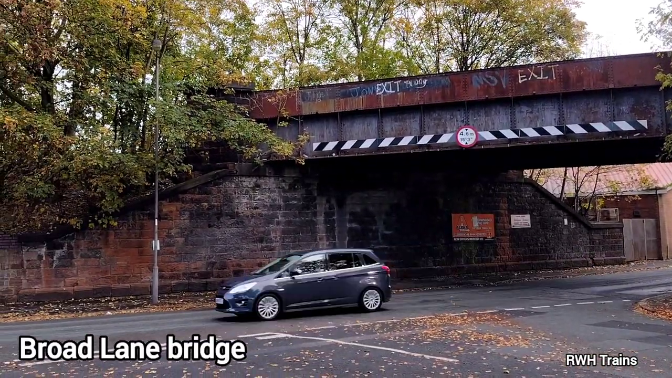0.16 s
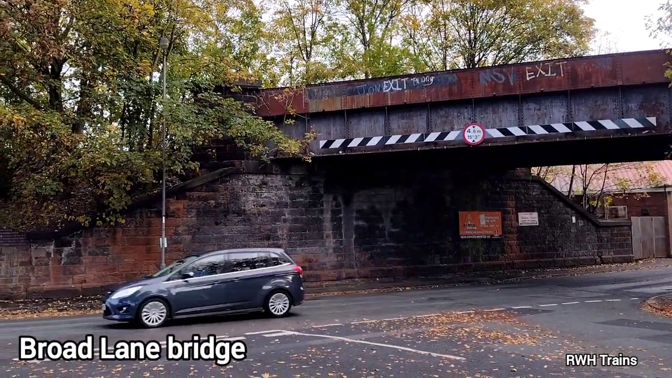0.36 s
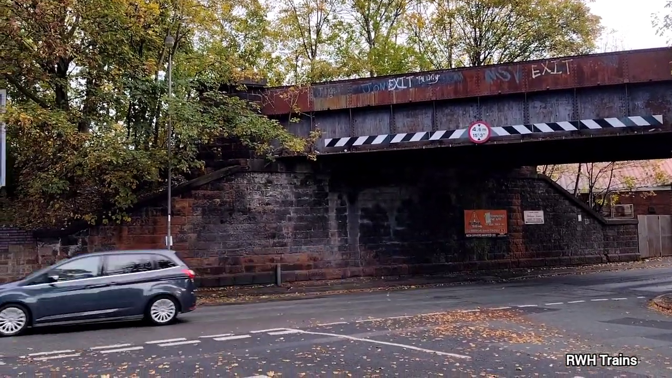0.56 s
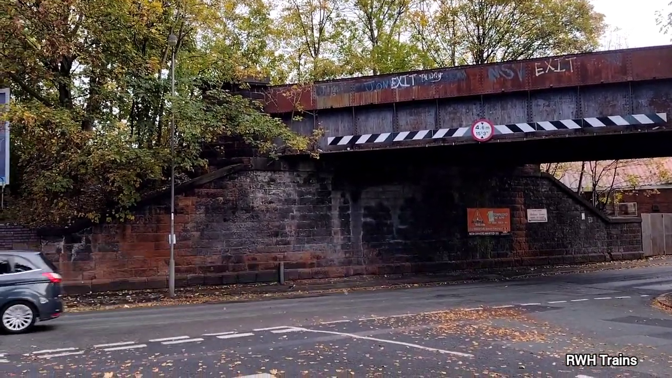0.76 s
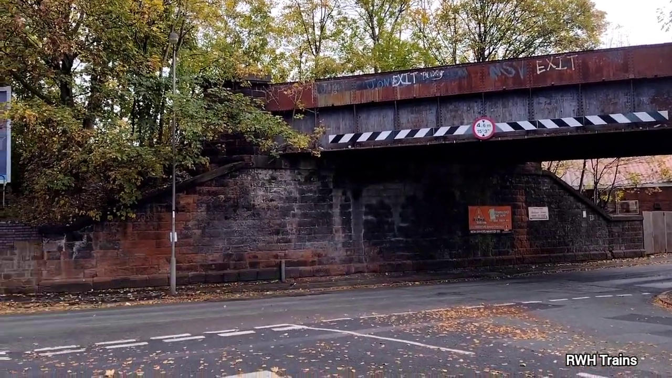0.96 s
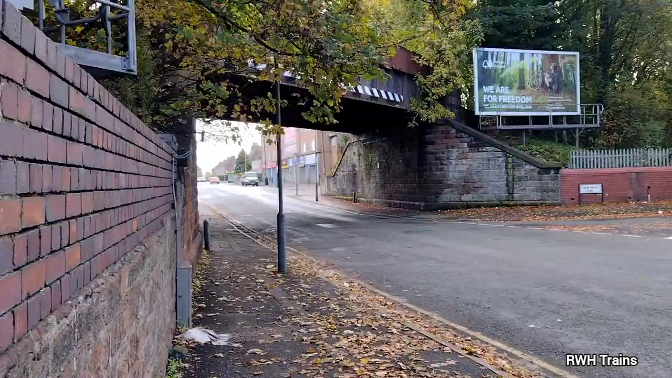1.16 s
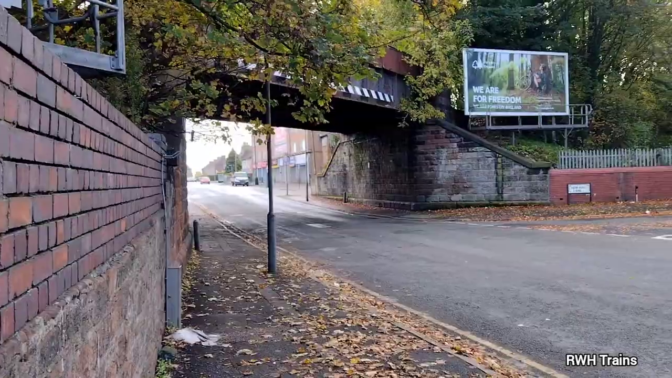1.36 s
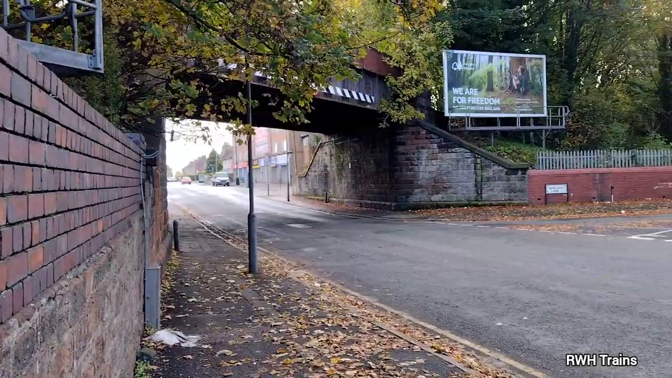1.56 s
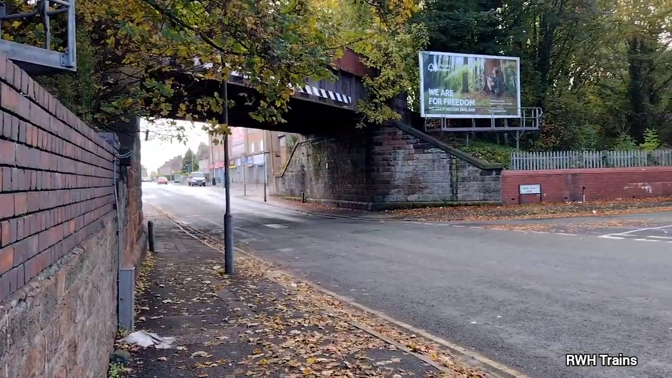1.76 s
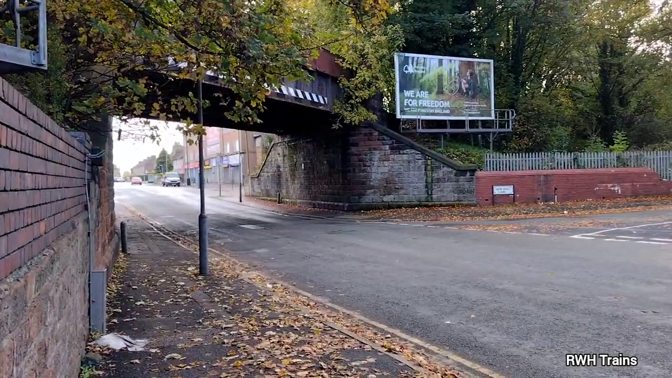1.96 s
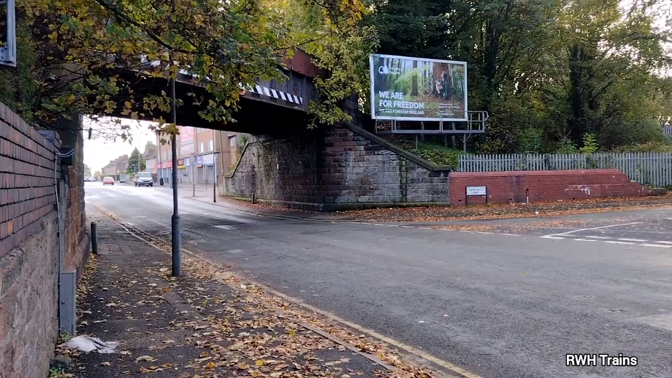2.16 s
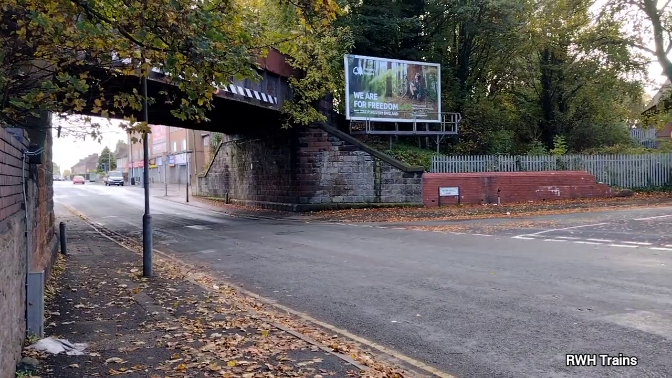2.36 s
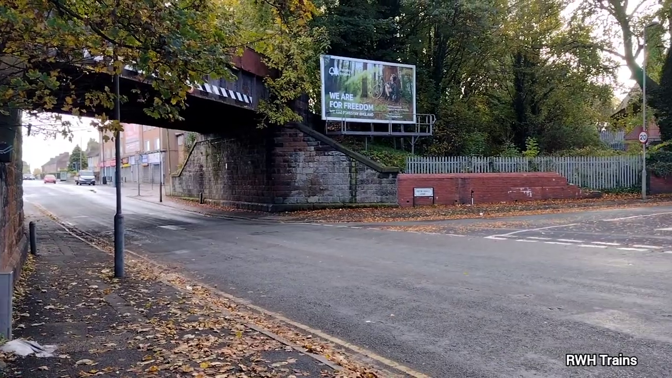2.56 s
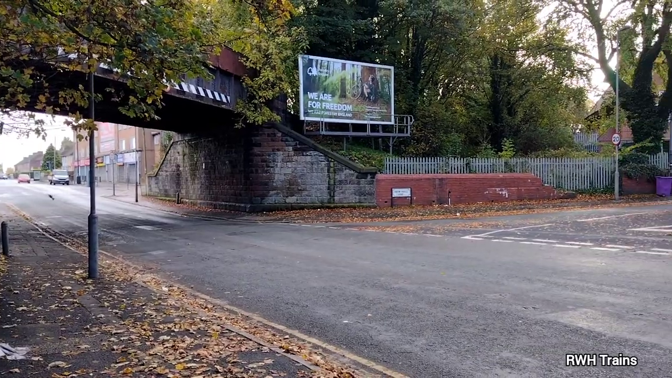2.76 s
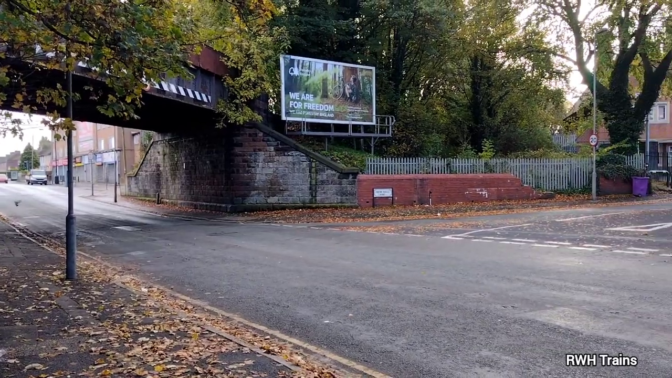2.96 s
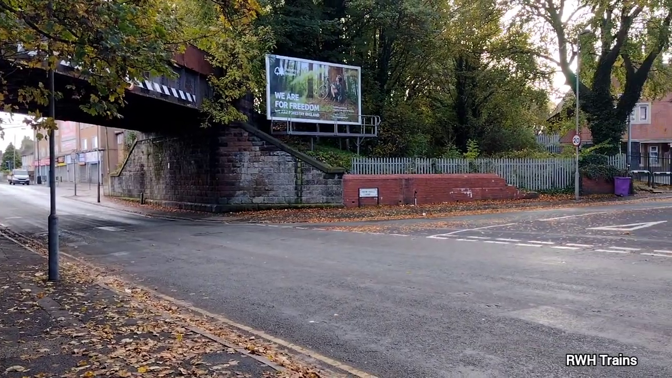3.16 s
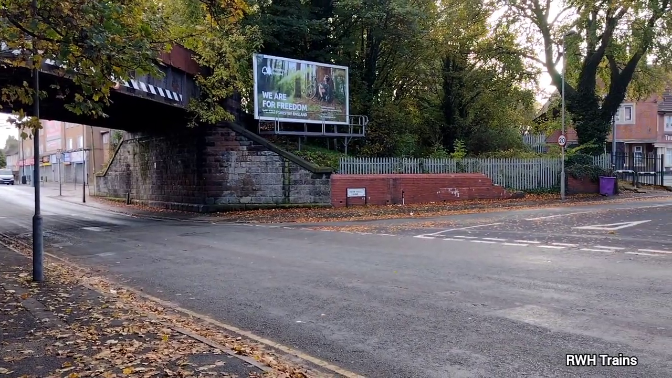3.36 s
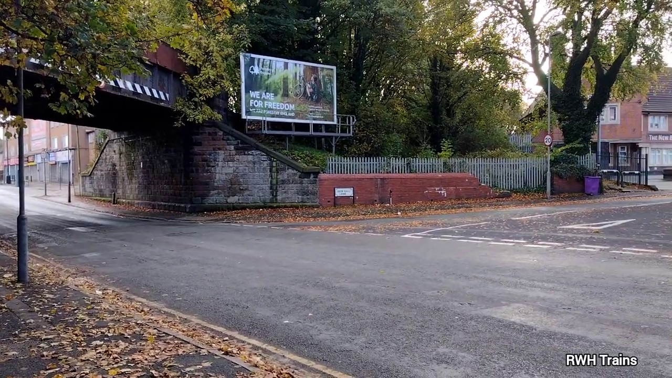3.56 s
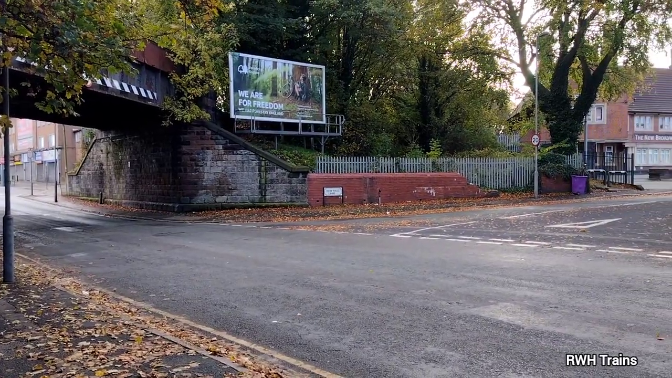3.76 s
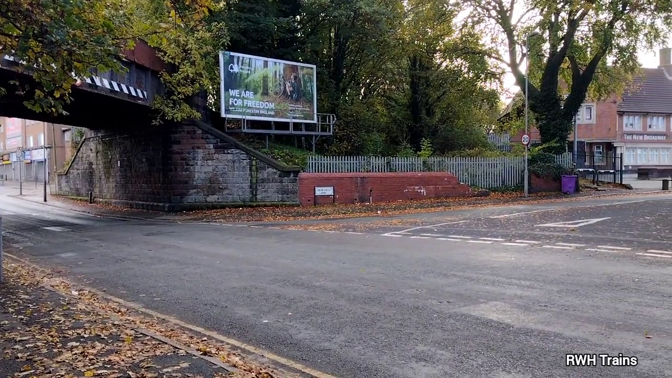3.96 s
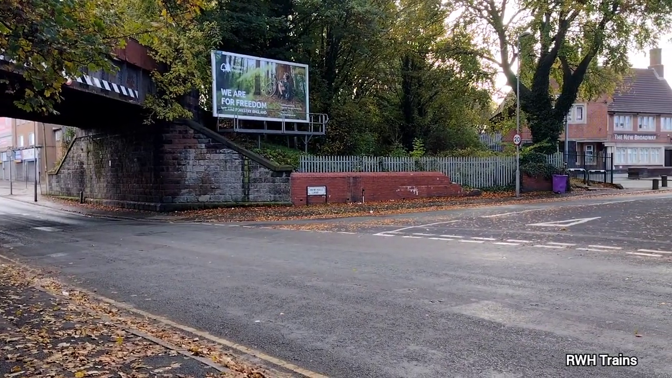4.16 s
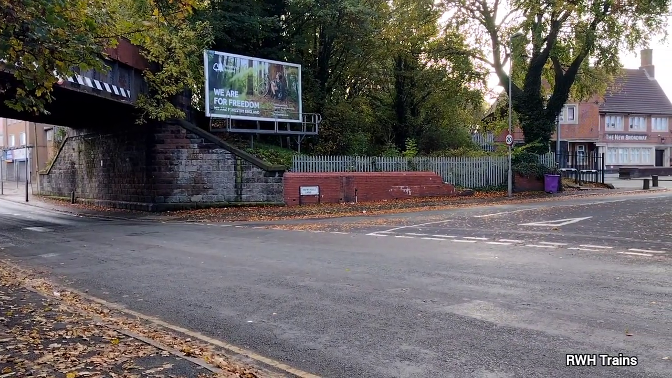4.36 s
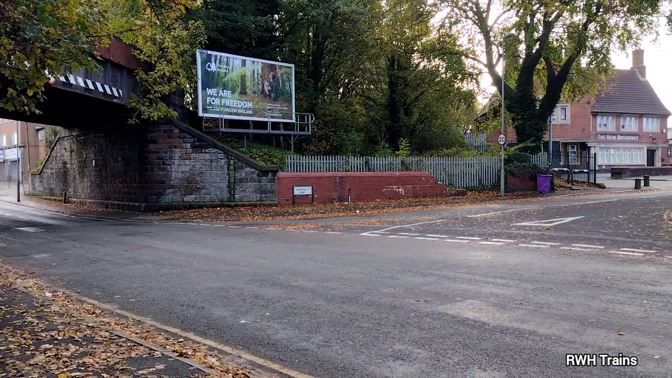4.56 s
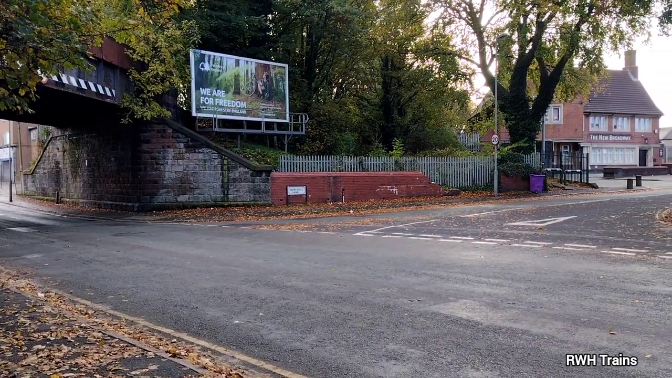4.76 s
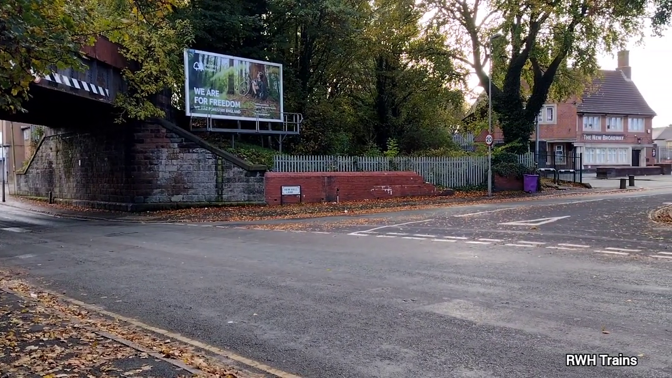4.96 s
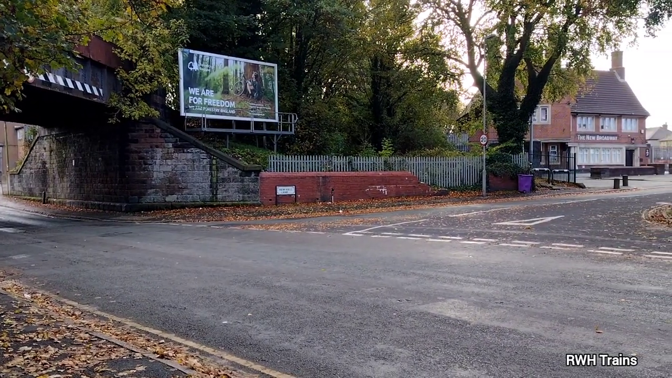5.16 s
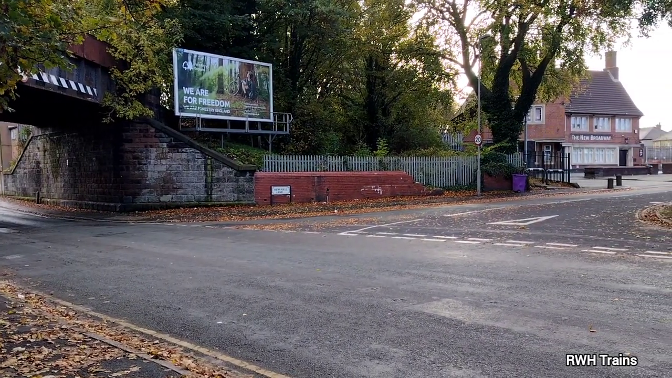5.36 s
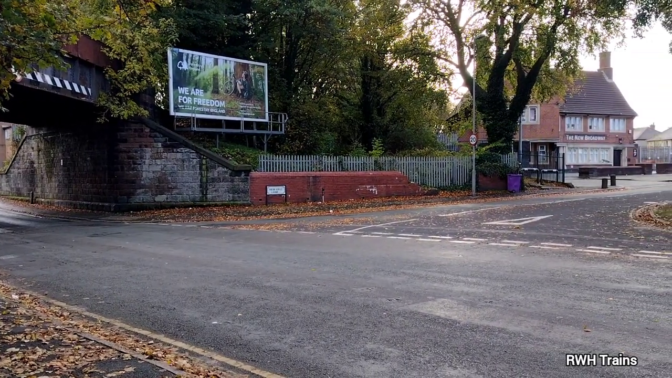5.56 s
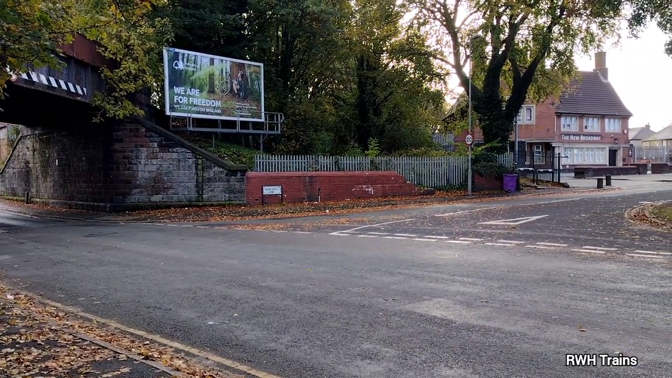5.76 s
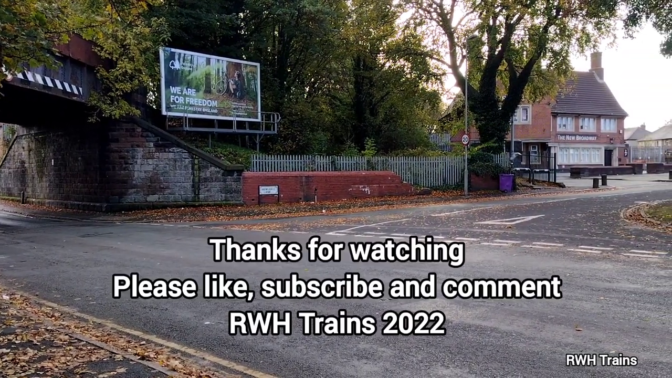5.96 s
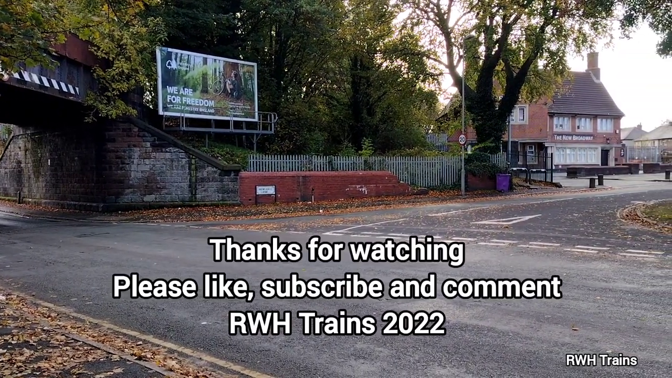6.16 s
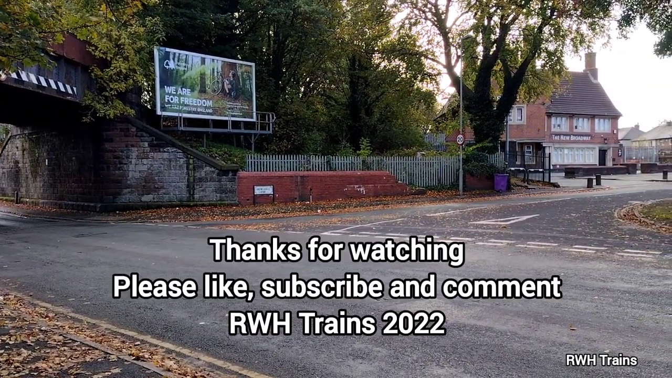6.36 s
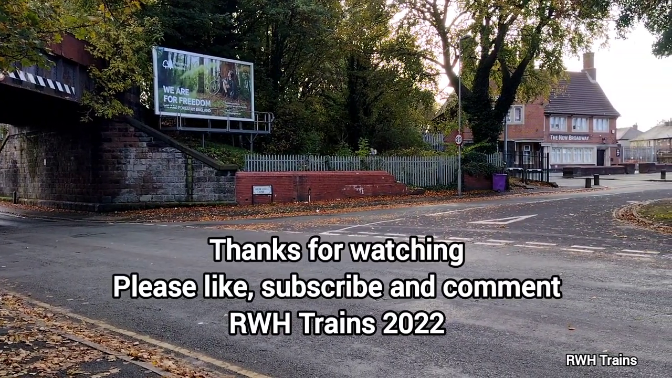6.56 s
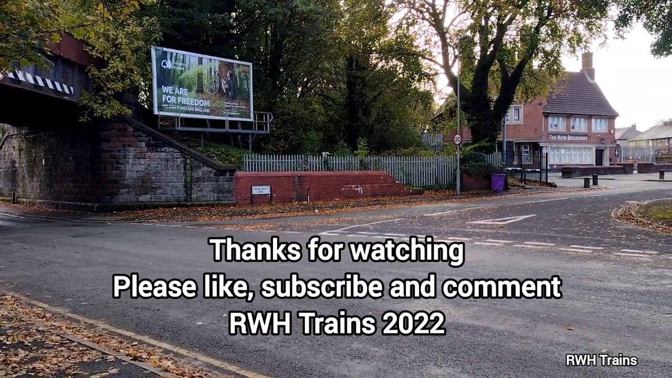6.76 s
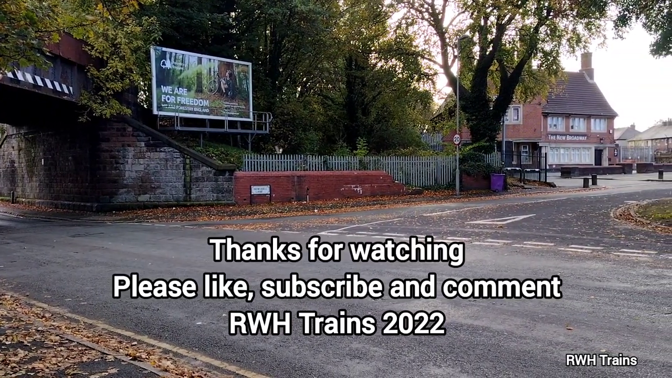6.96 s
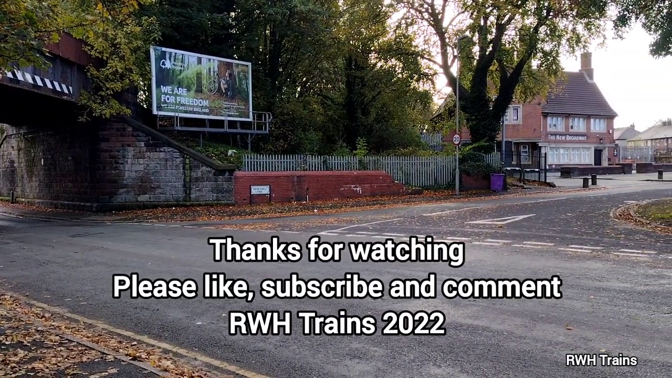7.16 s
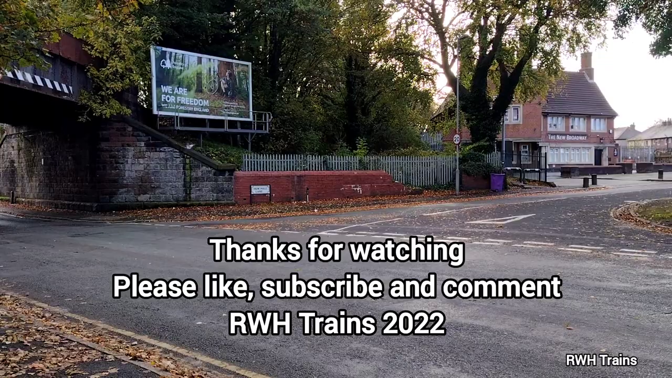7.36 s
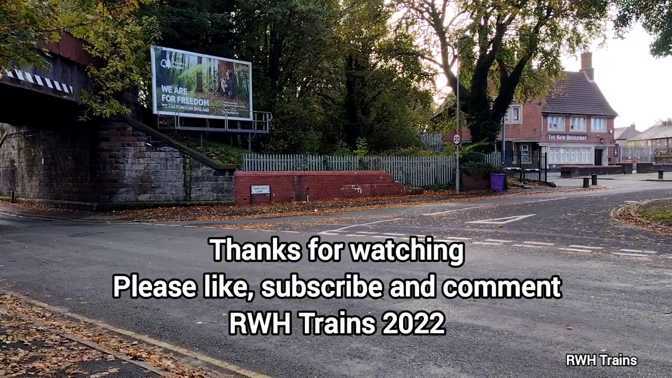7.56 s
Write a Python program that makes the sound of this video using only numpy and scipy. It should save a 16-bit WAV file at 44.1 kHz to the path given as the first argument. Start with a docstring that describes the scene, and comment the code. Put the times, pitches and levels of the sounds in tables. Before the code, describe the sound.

From 0 to 1.16 s a car rolls past close to a phone microphone: full, rough tyre roar, a narrow tread whine strongest near 0.5 s, slight treble sizzle, and a low engine drone sinking in pitch after 0.6 s. A faint high falling squeal sounds at 0.6 s, a thin bird note near 1 s. A hard cut then drops to a quiet roadside with soft distant traffic hum. Wind thumps low and lumpy, mostly left, with gusts around 1.2-1.8, 2.6-4 and 5.3-5.9 s, easing near the end. Dry leaves rustle and tick at 3-3.4, 3.8-4.4, 5.1-5.7 and 6.5-7.5 s. Small birds whistle faintly: clearer gliding notes at 2.2, 3.15-3.8 and 4.15 s, then quick short, sometimes hoarse chirps from 4.7 to 6.9 s, with brief diffuse echoes from trees.

```python
"""Small birds whistle at a road junction and then in a quiet corner beside a bridge, each note an
enveloped gliding sine smeared by noise echoes from the trees. At the junction a car rolls past close
to a phone, built from tyre noise, engine orders and a falling squeal; a hard cut jumps to the corner.
There far traffic hums as coloured noise, wind thumps the microphone ports, mostly the left, as low
noise and buffets, and dry leaves rustle and tick as grainy treble noise and short snaps."""
import sys
import numpy as np
from scipy import signal
from scipy.fft import rfft, irfft
from scipy.io import wavfile
from scipy.ndimage import uniform_filter1d

SR = 44100
rng = np.random.default_rng(int(sys.argv[2]) if len(sys.argv) > 2 else 0)


def int16_out(signal):
    """Quantize to a 16-bit WAV file."""
    q = np.round(np.clip(np.atleast_2d(signal).T, -1, 1) * 32767)
    wavfile.write(sys.argv[1], SR, q.astype(np.int16))


N = 335160
T = np.arange(N) / SR  # [s]
CUT_S = 1.159  # jump from the junction to the quiet corner


def undb(db):
    """Amplitude gain of a level in dB."""
    return 10 ** (np.asarray(db) / 20)


def unit(x):
    """Scale to rms 1."""
    return x / np.sqrt(np.mean(x ** 2))


def curves(table):
    """Columns of a time table, joined by straight lines."""
    time_s, *columns = np.transpose(table)
    return [np.interp(T, time_s, column) for column in columns]


def over_hz(table, hz):
    """A (frequency, value) table read on a log axis."""
    table_hz, values = np.transpose(table)
    return np.interp(np.log(hz + 1), np.log(table_hz), values)


def sides(pan_db):
    """Left and right gain for a level difference, half of it on each side."""
    return undb(np.array([pan_db, -pan_db]) / 2)


def walk(rate, size=N):
    """Random levels held 1 / rate s and smoothed twice; spread near 1."""
    hold = int(SR / rate)
    steps = np.repeat(rng.standard_normal(size // hold + 1), hold)
    return 1.35 * uniform_filter1d(uniform_filter1d(steps, hold), hold)[:size]


def band(x, lo_hz, hi_hz):
    """Band-pass with gentle edges."""
    return signal.sosfilt(signal.butter(2, [lo_hz, hi_hz], "bandpass", fs=SR, output="sos"), x)


# Likeness of the two microphone ports: (frequency [Hz], correlation [0-1])
PORT_CORRELATION = [(60, 0.99), (130, 1), (290, 0.98), (640, 0.88), (1410, 0.37), (3100, 0.047),
                    (6820, 0.097), (15000, 0.18)]
# Balance of the two microphone ports: (frequency [Hz], left minus right [dB])
PORT_TILT = [(60, 8), (110, -1.5), (200, 1), (380, -1), (700, -1.5), (1290, -0.5), (2380, 4.5),
             (4400, -2.5), (8120, -3), (15000, 3.5)]


def at_ports(spectrum, ref_hz, lag_s, flicker_db, flicker_rate, swells=(), grit=1, size=N, count=10):
    """Coloured noise at two ports: alike in the bass, less so in the treble, the right port late by lag_s.

    It is split into count bands that flicker alone; each (Hz, dB curve) swell moves those nearby.
    Before flicker and swells the rms is 1 inside ref_hz, both ports counted together."""
    hz = np.fft.rfftfreq(size, 1 / SR)
    like = np.clip(over_hz(PORT_CORRELATION, hz), 0, 1)
    mid, side = rfft(grit * rng.standard_normal((2, size)))
    mid, side = mid * np.sqrt(1 + like), side * np.sqrt(1 - like)
    late = np.exp(-2j * np.pi * hz * lag_s)
    pair = np.array([mid + side, (mid - side) * late])
    pair *= sides(over_hz(PORT_TILT, hz)) * undb(over_hz(spectrum, hz))
    inside = (hz > ref_hz[0]) & (hz < ref_hz[1])
    scale = np.sqrt(np.sum(abs(pair[:, inside]) ** 2)) / size  # rms from the spectrum

    step = np.log2(16384 / 32) / (count - 1)  # octaves between band centres
    place = np.log2(np.clip(hz, 32, 16384) / 32) / step
    out = 0
    for k in range(count):
        centre_hz = 32 * 2 ** (k * step)
        db = flicker_db * walk(flicker_rate, size=size)
        for mid_hz, swell_db in swells:
            db += np.exp(-np.log2(centre_hz / mid_hz) ** 2) * swell_db
        share = np.clip(1 - abs(place - k), 0, 1)  # neighbouring bands cross-fade
        out = out + irfft(pair * share, size) * undb(db)
    return out / scale


# Far traffic's swells: (time [s], tyre band swell [dB], engine band swell [dB])
TRAFFIC_SWELLS = [(1.17, 2.5, 4), (1.9, 0.5, 0), (2.5, -3.5, 2.5), (3.2, -1, -1), (4.3, -3, -2),
                  (5.5, -1.5, -1), (6.3, 1.5, 2), (7.6, 0.5, 0.5)]
# Colour of the far traffic: (frequency [Hz], relative level [dB per Hz])
TRAFFIC_COLOUR = [(25, -4), (69, -7), (148, -16), (313, -16), (445, -25), (666, -17.5), (1000, -20),
                  (1300, -23.5), (1900, -22), (2500, -29.5), (2950, -38), (4500, -41.5), (6380, -42.5),
                  (9300, -41), (11500, -53.5), (15500, -54)]
TRAFFIC_DB = -48.5  # inside 500-1300 Hz, before the swells


def far_traffic():
    """Distant tyres and engines blend into coloured noise whose two bands swell separately."""
    tyre_db, engine_db = curves(TRAFFIC_SWELLS)
    swells = [(850, tyre_db), (288, engine_db)]
    return at_ports(TRAFFIC_COLOUR, (500, 1300), 0.00027, 0.83, 6, swells=swells) * undb(TRAFFIC_DB)


# Wind gusts: (time [s], level at the left port before puffs [dB], left minus right [dB])
GUSTS = [(1.17, -26.5, 20), (1.42, -28, 11.5), (1.6, -25.5, 20), (1.8, -36, 17), (2.08, -33.5, 16),
         (2.2, -54, 5), (2.4, -48, 5), (2.58, -28.5, 14), (2.82, -26, 17), (2.9, -34, 15),
         (3.16, -26.5, 16), (3.41, -32.5, 17), (3.64, -26.5, 21), (3.75, -34.5, 15), (4.0, -29, 23),
         (4.3, -41, 6), (4.8, -36.5, 6.5), (5.3, -31, 14), (5.4, -27.5, 5), (5.8, -27, 9.5),
         (6.0, -36.5, 7), (6.31, -32, 18), (6.42, -45, 11), (6.54, -29.5, 9), (6.72, -47, 0), (7.6, -50, 2)]
# Lone buffets on the left port: (onset [s], envelope peak [dB], frequency [Hz])
LONE_BUFFETS = [(1.204, -12, 93), (1.89, -23, 50), (2.591, -13, 85), (2.619, -27, 90), (3.189, -16.5, 90),
                (3.573, -26, 90), (4.21, -19.5, 60), (4.366, -17, 74.6), (4.5, -27, 60), (4.629, -21.5, 60),
                (4.751, -19.5, 59.6), (4.88, -21.5, 60), (5.391, -10, 90.5), (5.409, -19, 89),
                (5.493, -15, 93), (5.608, -15.5, 90.5), (5.75, -14, 89), (6.55, -20, 87), (7.199, -24, 76)]
PUFF_DB, PUFFS_PER_S = 2, 9
# Ragged upper edge of the wind: level against the gust; port level from which it is full
RAGGED_DB, RAGGED_FULL_DB = -13.5, -25.5


def wind():
    """Eddies thump each port separately: lumpy low noise puffing along the gust, plus brief buffets."""
    left_db, pan_db = curves(GUSTS)
    lumps = undb(3.4 * np.array([walk(45), walk(45)]))
    eddies = band(band(lumps * rng.standard_normal((2, N)), 26.5, 102), 13, 254)
    eddies /= np.sqrt(uniform_filter1d(eddies ** 2, size=SR // 8) + 1e-9)  # gust and puffs set the slow level
    puffs_db = PUFF_DB * np.array([walk(PUFFS_PER_S), walk(PUFFS_PER_S)])
    port_db = [left_db, left_db - pan_db] + puffs_db
    ragged = unit(band(lumps ** 1.5 * rng.standard_normal((2, N)), 119, 250))
    # strong gusts reach higher in pitch
    ragged_db = RAGGED_DB + 0.53 * np.minimum(port_db - RAGGED_FULL_DB, 0)
    out = (eddies + ragged * undb(ragged_db)) * undb(port_db)
    for onset_s, peak_db, hz in LONE_BUFFETS:
        cycle = hz * (T - onset_s) - .6  # envelope peaks 0.6 cycle after the onset
        envelope = np.exp(-(cycle / 0.45) ** 2)
        out[0] += undb(peak_db) * envelope * np.cos(2 * np.pi * cycle - .6)
    return out


def tick(length):
    """A dry snap ringing the microphone port for a moment."""
    t = np.arange(length) / SR
    snap = rng.standard_normal((2, length)) * np.exp(-t / 0.002)
    return band(snap, 8500, 11200) + .4 * band(snap, 6000, 14000)


# Colour of the dry leaves: (frequency [Hz], relative level [dB per Hz])
LEAF_COLOUR = [(2500, -17), (4500, -10), (6500, -9), (8200, -3.5), (10000, -3), (12000, -9.5), (15500, -22)]
# Leaf rustles: (start [s], rise [s], hold [s], fall [s], level once risen [dB], level before falling [dB],
# left minus right [dB], swell around 14 kHz [dB])
LEAF_RUSTLES = [(1.165, .03, .33, .06, -64.5, -69, 4, 7.5),
                (3.027, 0.064, .17, 0.26, -55.5, -54.5, 0.5, 5.5), (3.55, 0.14, .05, .1, -64, -62, 0, -3),
                (3.84, .06, .1, 0.13, -62, -68, 1, 2), (4.22, .06, 0.18, .07, -63, -61, 3, 6.5),
                (5.088, 0.038, 0.47, .07, -54.5, -58.5, 0.5, -2.5),
                (5.637, 0.035, .04, .07, -59, -64, 0, 0), (6.5, 0.21, .45, .13, -55, -56.5, 0.5, -8),
                (7.28, .1, .3, .05, -62, -59, -2, -8)]
# Leaf ticks placed by hand: (time [s], peak before panning [dB], left minus right [dB])
PLACED_TICKS = [(1.3064, -35, -0.5), (1.5024, -43, 4.5), (1.7054, -46, -0.5), (3.0754, -40, -3.0),
                (3.0964, -35, -3.5), (3.1996, -39, -3.0), (3.2415, -33, -3.5), (3.2764, -41, -3.0),
                (3.3373, -44, -1.5), (3.4047, -43, -2.0), (3.8611, -41, -8), (3.8931, -40, -3.0),
                (3.9005, -37, -7), (3.9184, -46, -2.5), (3.9379, -41, -5.5), (3.9883, -48, -3.0),
                (4.0432, -41, -4.5), (4.0644, -43, -3.5), (4.0926, -40, -2.5), (4.5022, -43, -0.5),
                (4.5181, -38, 1.5), (4.776, -44, -7), (5.661, -40, 0.5), (5.907, -45, -2.0),
                (6.1794, -43, -3.0), (6.3041, -44, -3.5), (6.5725, -43, -3.0), (6.6643, -43, -4.5),
                (6.7156, -41, -4.5), (6.7421, -45, -6.0), (6.8274, -38, -3.0), (6.8833, -43, -5),
                (6.9496, -45, -2.5), (6.9915, -42, -4.0), (7.009, -40, -5.0), (7.0984, -44, -2.0),
                (7.1804, -45, -2.0), (7.3118, -42, -5.0), (7.5178, -39, -4.0)]
STILL_DB = -68.5  # leaf bed between rustles
# Leaf ticks at random times: count, peak before panning, mean left minus right
STRAY_TICKS, STRAY_TICK_DB, STRAY_TICK_PAN_DB = 20, -45, -3


def leaves():
    """Dense crackle of uneven grains, stirred up in bursts over a still bed; lone ticks, placed and stray."""
    rustle_db, pan_db, bright_db = np.full(N, 1. * STILL_DB), 0, 0
    for s, rise, hold, fall, start_db, end_db, pan, bright in LEAF_RUSTLES:
        on = np.interp(T, s + np.cumsum([0, rise, hold, fall]), [0, 1, 1, 0])
        stirred_db = np.interp(T, [s + rise, s + rise + hold], [start_db, end_db])
        rustle_db += on * (stirred_db - STILL_DB)
        pan_db = pan_db + on * pan
        bright_db = bright_db + on * bright
    grain_db = 2.2 * np.minimum(rng.exponential(size=N // 64 + 1), 4.0)
    grains = np.repeat(undb(grain_db), 64)[:N]  # each lasts 64 samples
    crackle = at_ports(LEAF_COLOUR, (9500, 13500), 0.000204, 2.1, 30,
                       swells=[(14000, bright_db)], grit=grains, count=8)
    out = crackle * undb(rustle_db) * sides(pan_db)

    stray_s = rng.uniform(CUT_S, T[-1], STRAY_TICKS)
    stray_pan_db = STRAY_TICK_PAN_DB + 2 * rng.standard_normal(STRAY_TICKS)
    stray = np.column_stack([stray_s, np.full(STRAY_TICKS, STRAY_TICK_DB), stray_pan_db])
    for s, peak_db, pan in [*PLACED_TICKS, *stray]:
        snap, i = tick(length=400), int(s * SR)
        snap = undb(peak_db) * snap / abs(snap).max() * sides(pan)[:, None]
        out[:, i:i + 400] += snap[:, :N - i]
    return out


# Passing car: (time [s], tyre roar [dB], tread whine [dB], treble sizzle [dB], engine firing rate [Hz],
# engine [dB], roar swell around 170 Hz [dB], roar swell around 5.5 kHz [dB])
CAR_PASS = [(0.0, -27, -38, -38, 87.3, -33.5, -2, 2.5), (0.26, -27, -37, -40, 88, -38, 0, 1.5),
            (0.37, -25.5, -34, -35, 87.9, -36, 1, 1), (0.48, -26.5, -32, -40.5, 87.1, -34, 3, 2.5),
            (0.57, -26.5, -38, -37, 85.9, -31.5, 4.5, 1.5), (0.68, -25.5, -43, -44.5, 83.85, -32, 1.5, 0),
            (0.9, -25.5, -46, -47, 73.65, -34.5, 5, -2.5), (1.15, -26.5, -43, -45.5, 74, -28.5, 4, -3)]
# Colour of the tyre roar: (frequency [Hz], relative level [dB per Hz])
TYRE_COLOUR = [(25, -9.5), (86, -4.5), (267, -5.5), (495, -13.5), (666, -6.5), (1050, -4), (1450, -13),
               (1800, -8), (2450, -15), (2850, -23.5), (4040, -23), (4750, -29), (6700, -27), (7400, -25.5),
               (10500, -31), (15500, -47)]
# Engine orders: (multiple of the firing rate, relative amplitude [dB])
ORDERS = [(1, 0.5), (1.5, -16), (2, -6), (2.5, -11), (3, -4)]


def car():
    """Tyre roar in flickering narrow bands, a narrow tread whine, a treble sizzle, rough engine orders."""
    n = 52920  # 1.2 s, just past the cut
    columns = [column[:n] for column in curves(CAR_PASS)]
    roar_db, whine_db, sizzle_db, firing_hz, engine_db, bass_db, treble_db = columns
    roar = at_ports(TYRE_COLOUR, (500, 2500), .0001, 1.4, 5.85,
                    swells=[(170, bass_db), (5500, treble_db)], size=n, count=28)
    sizzle = band(rng.standard_normal((2, n)), 8770, 10100) * undb(2.4 * walk(70.7, size=n))
    whine = band(band(rng.standard_normal((2, n)), 1710, 1960), 1710, 1960)
    turns = np.cumsum(firing_hz * (1 + 0.01 * walk(29.3, size=n))) / SR  # firing cycles so far
    engine = 0
    for order, order_db in ORDERS:
        rough_gain = undb(order_db + 5.1 * walk(11.85, size=n))
        engine = engine + rough_gain * np.sin(2 * np.pi * (order * turns + rng.random()))
    out = roar * undb(roar_db) + engine * undb(engine_db)
    out += unit(sizzle) * undb(sizzle_db) + unit(whine) * undb(whine_db)
    return np.pad(out, ((0, 0), (0, N - n)))


# Gliding tones, the first row a falling car squeal and the rest bird notes: (start [s], length [s],
# start pitch [Hz], end pitch [Hz], level before the swell [dB], left minus right [dB],
# pitch roughness [share], loudest place [0-1 of the tone], echo against direct [dB])
GLIDES = [(0.59, .07, 8500, 8050, -52, 0, 0.004, .5, 6), (0.972, 0.09, 8400, 7750, -43, -1, 0.0036, 0.5, 5),
          (1.13, 0.028, 8500, 7800, -38, 1, 0, 1, 4), (1.505, 0.045, 5000, 4320, -66.5, -7, 0.022, .4, 9),
          (1.68, 0.084, 3900, 4030, -70, 0, 0, .7, 7), (1.816, .26, 4060, 3940, -72, 2, 0.0071, .4, 4),
          (2.127, 0.21, 3970, 3850, -71, 2, 0, 0.25, 4),
          (2.168, 0.092, 4830, 5400, -55, -6, 0.055, 0.54, -5),
          (2.191, 0.035, 2300, 2240, -46, 2, 0.035, 0.5, -9),
          (2.451, .04, 8040, 7600, -63.5, 0, .03, .3, 3), (2.964, 0.057, 5960, 6400, -64, -3, .015, .6, 7),
          (3.103, .06, 6400, 6450, -69, -2, .015, .6, 3), (3.238, .06, 6300, 6460, -66, 0, .015, .4, 10),
          (3.147, 0.068, 4850, 4050, -47.5, 1, 0.02, .7, 3),
          (3.312, 0.118, 3680, 4000, -47, 7, 0.002, 0.93, -3),
          (3.49, 0.071, 11100, 10500, -71, 0, 0.0058, .4, -3),
          (3.68, .06, 10900, 9600, -73, 0, 0.0098, .4, -3),
          (3.51, 0.076, 4660, 3980, -49, 2.5, 0.012, 0.65, 4.5),
          (3.695, 0.13, 3590, 3900, -52.5, 3, 0.0033, 0.8, -0.5),
          (4.153, 0.1, 7230, 7040, -53, -1.5, .008, 0.35, 9.5),
          (4.161, 0.081, 9100, 8600, -58.5, -1, 0.017, 0.2, 10.5),
          (4.65, 0.056, 4920, 4760, -67, -4, 0.022, 0.5, 8),
          (4.787, 0.035, 4970, 4900, -62, -4, 0.037, .4, 9),
          (4.788, 0.024, 4600, 4260, -56.5, -3, 0, 0.15, 10.5),
          (4.931, 0.048, 3580, 3360, -50, 4, 0.016, .4, 1),
          (5.112, 0.056, 5060, 4300, -58, -4, 0.089, 0.5, 7),
          (5.143, 0.012, 3960, 3740, -49, 7, 0.018, 0.3, 2),
          (5.266, 0.018, 3950, 3200, -56, 4, 0.026, 0.5, 10),
          (5.303, .025, 3780, 3760, -50, 4, 0.024, 0.4, 6),
          (5.338, 0.026, 3790, 3745, -48, 5, 0.015, 0.4, 0),
          (5.528, 0.03, 3340, 4020, -53, 2, 0.047, 0.26, 7.5),
          (5.686, 0.065, 3844, 3610, -56.5, 4, 0.026, 0.25, 7),
          (5.69, 0.12, 4640, 4170, -58.5, -4, 0.061, 0.45, 7),
          (6, .08, 5080, 4950, -55.5, -6, 0.049, 0.3, 0), (6.018, 0.026, 2420, 2400, -49, 3, 0.07, 0.3, 1),
          (6.331, 0.028, 3455, 3350, -52.5, 4, 0.027, 0.3, 5),
          (6.34, 0.042, 3790, 3690, -53.5, 4, 0.019, 0.5, 1),
          (6.366, .05, 3400, 4220, -54, -2, 0.074, 0.3, 4),
          (6.448, 0.057, 4290, 3390, -52.5, 2, 0.063, .4, 4.5),
          (6.48, 0.037, 2880, 2900, -59, 9, .03, .4, 3), (6.593, .025, 3780, 3790, -60.5, 7, .01, .4, -2),
          (6.598, 0.091, 3710, 3030, -56, 4, 0.085, 0.2, 5.5),
          (6.72, 0.031, 3560, 3295, -53, 3, 0.016, .3, 3), (6.8, 0.085, 3300, 3140, -61, 5, 0.036, .4, 6),
          (6.837, 0.033, 3540, 3480, -47, 6, 0.0044, .4, -2.5),
          (6.87, 0.071, 3550, 3520, -60, 2, 0.0041, 0.74, -8)]
CAR_SQUEAL, *BIRD_NOTES = GLIDES
TREES_T60_S = 0.93  # time for the echoes to fall 60 dB


def squeal_and_birds():
    """Gliding tones, some hoarse: the car's squeal, then bird whistles; echoes trail roughly behind each."""
    direct, sent = np.zeros((2, 2, N))
    flutter = undb(3.37 * walk(120))  # moving air and leaves break the tones up
    waver = walk(1100)  # quick pitch scatter turns a tone hoarse
    for s, length, start_hz, end_hz, db, pan, rough, top, echo_db in [CAR_SQUEAL, *BIRD_NOTES]:
        u = np.linspace(0, 1, int(max(length, .01) * SR))
        span = slice(int(s * SR), int(s * SR) + len(u))
        glide = 1 - (1 - u) ** 1.5  # fast at first, then settling
        hz = (start_hz + (end_hz - start_hz) * glide) * (1 + rough * waver[span])
        swell = np.sin(np.pi / 2 * np.interp(u, [0, np.clip(top, .05, .95), 1], [0, 1, 0]))
        sine = np.sqrt(2) * np.sin(2 * np.pi * np.cumsum(hz) / SR)  # rms 1
        tone = undb(db) * sides(pan)[:, None] * swell * unit(flutter[span]) * sine
        direct[:, span] += tone
        sent[:, span] += tone * undb(echo_db)

    t = np.arange(SR) / SR
    decay = np.exp(-np.log(1000) * t / TREES_T60_S) * (1 - np.exp(-t / 0.0044))  # soft onset, long fall
    echoes = rng.standard_normal((2, SR)) * decay
    echoes /= np.sqrt(np.sum(echoes ** 2, axis=1, keepdims=True))
    out = 0
    for spot in (T < CUT_S, T >= CUT_S):  # echoes do not cross the cut
        tail = signal.fftconvolve(sent * spot, echoes, axes=1)[:, :N]
        out = out + (direct + tail) * spot
    return out


def scene():
    """The car at the junction, then traffic, wind and leaves in the corner; birds at both places."""
    wind_in = np.clip((T - CUT_S) / 0.034, 0, 1) ** 2  # the wind fades in after the cut
    corner = far_traffic() + wind_in * wind() + leaves()
    return np.where(T < CUT_S, car(), corner) + squeal_and_birds()


def record(dry):
    """The phone cuts the top steeply, above 15.77 kHz."""
    return signal.sosfilt(signal.ellip(14, .2, 90, 15770, fs=SR, output="sos"), dry)


dry = scene()
out = record(dry)
int16_out(out)
```